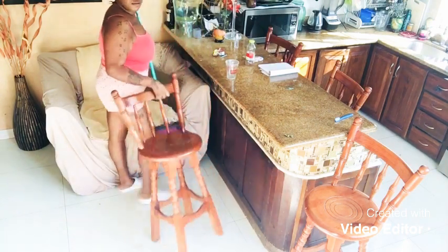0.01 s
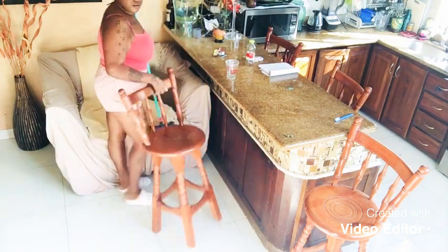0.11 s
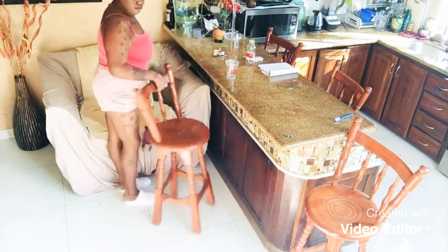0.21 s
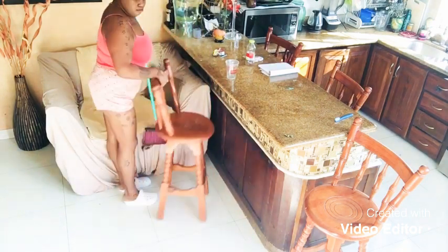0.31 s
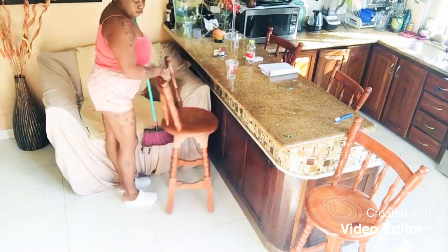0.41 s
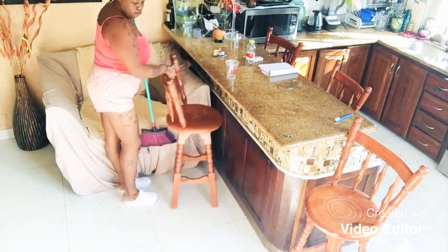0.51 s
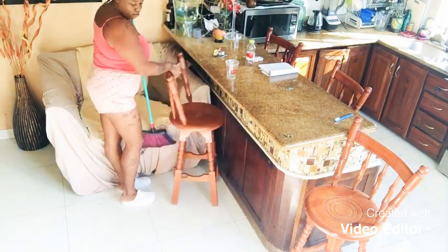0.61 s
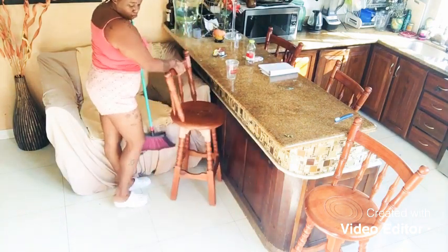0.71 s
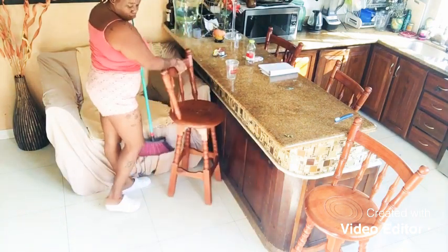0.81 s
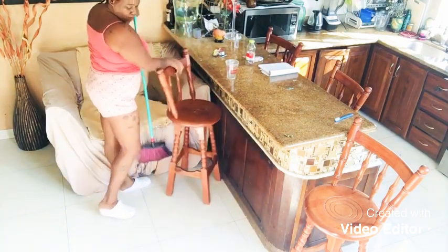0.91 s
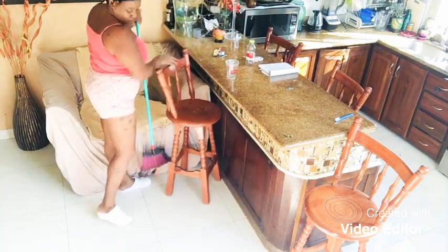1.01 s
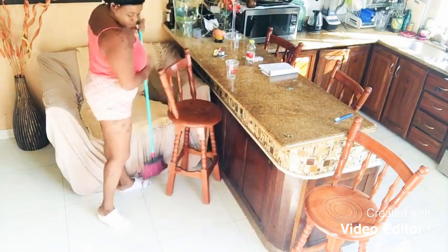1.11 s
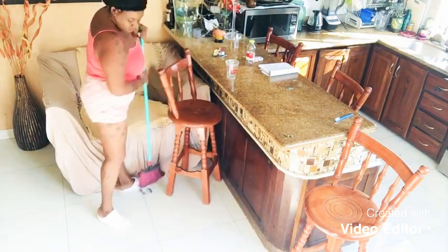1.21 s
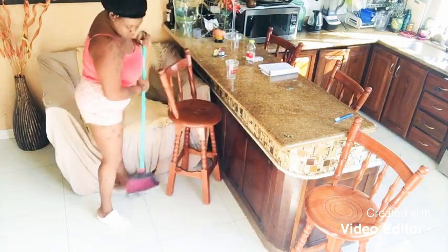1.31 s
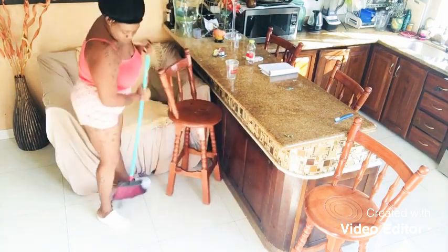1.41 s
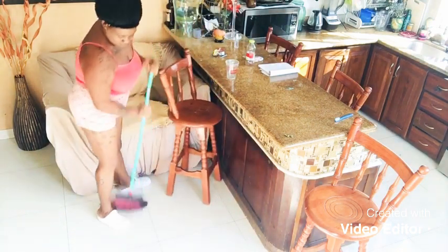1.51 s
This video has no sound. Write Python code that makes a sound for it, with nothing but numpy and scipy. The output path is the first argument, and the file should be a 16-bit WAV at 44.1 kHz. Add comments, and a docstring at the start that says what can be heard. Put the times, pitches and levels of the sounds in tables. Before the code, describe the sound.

A wooden stool scrapes and groans over a tiled floor after landing with a knock, settles, then briefly scrapes again. Dull steps thud underneath and a broom sweeps faintly, all heard from across a hard, echoing kitchen.

```python
"""A wooden stool is set down and dragged over a tiled kitchen floor: its feet stick and slip, bite on
the tile and shake the frame, and its legs groan. It knocks to rest and gets one more short shove.
Steps make the hard room boom low; a broom sweeps and a slipper scuffs faintly. One microphone
stands in the kitchen, far enough off that the knocks are almost matched by their echo."""
import sys
import numpy as np
from scipy import signal
from scipy.fft import rfft, irfft
from scipy.io import wavfile
from scipy.ndimage import uniform_filter1d

SR = 44100
rng = np.random.default_rng(int(sys.argv[2]) if len(sys.argv) > 2 else 0)


def inscribe(sig):
    """Save sig as 16-bit PCM at rate SR to the path in sys.argv[1].

    A 1-D sig is mono; a 2-D sig holds one channel per row.
    Samples are clipped to [-1, 1] before scaling.
    """
    pcm = np.round(np.clip(np.atleast_2d(sig).T, -1, 1) * 32767)
    wavfile.write(sys.argv[1], SR, pcm.astype(np.int16))


N = 70560


def drag(feet=2, slide_grit=0.58, bite_grit=1.6):
    """The stool's feet judder over the tile, rasp brighter where they bite, and shake the frame."""
    pressure = [(.21, -90), (.235, -53), (.27, -25.5), (.30, -38), (.355, -32.5), (.41, -23.5), (.46, -29),
                (.53, -29.5), (.59, -29), (.66, -32), (.70, -39), (.76, -44.5), (.82, -48.5), (.875, -36.5),
                (.92, -44.5), (1.04, -50), (1.105, -30.5), (1.15, -38.5), (1.22, -99.5)]  # bearing of the sliding feet: time_s, level_db
    slide_colour = [(30, -26.5), (70, -24.5), (120, -2), (280, -1.5), (500, 2), (780, -3.5), (1150, 1),
                    (2100, -11.5), (3600, -20.5), (4900, -29.5), (7000, -31), (15000, -52.5)]  # spectrum of the slide: frequency_hz, level_db
    bites = [(0.374, -24, 0.0035, 0), (.401, -13.5, 0.0037, 0), (0.435, -23, 0.0019, -3.5),
             (0.488, -25.5, 0.0087, -0.5), (0.539, -21.5, .006, -4.5), (0.567, -22, 0.0083, 2.5),
             (0.584, -17, 0.0053, 0.5), (0.624, -29, .004, 2), (.644, -18, 0.0086, 1.5),
             (0.878, -37.5, 0.0064, 2), (1.118, -25.5, 0.005, -1)]  # a foot catching: peak_s, level_db, half_length_s, tilt_db_per_octave
    bite_colour = [(60, -14), (400, -10), (1100, -2), (2100, 1), (2700, -4), (3700, -7.5), (4900, -21.5),
                   (7000, -27), (10000, -36), (15000, -53)]  # spectrum of a bite: frequency_hz, level_db
    out = level(pressure) * unit(sum(wood(slips(slide_grit), slide_colour) for _ in range(feet)))
    for peak_s, db, half_s, tilt_db in bites:
        grip = np.exp(-.5 * ((clock() - peak_s) / half_s) ** 2)
        rasp = wood(slips(bite_grit) * grip, bite_colour, tilt_db)
        out += amp(db) * rasp * np.sqrt(2 * half_s * SR) / np.linalg.norm(rasp)
    return room(out, wet_db=-2.5) + room(shudder(slips(slide_grit)), wet_db=-11)


def slips(grit, mean_slips_per_s=600, scatter_db=3):
    """Force at a sliding foot: uneven stick-slip jerks over fine grit."""
    pace = np.repeat(rng.exponential(1, N // 64 + 1), 64)[:N]
    cycles = np.cumsum(pace) * mean_slips_per_s / SR
    jerks = np.diff(np.floor(cycles), prepend=0) * scatter(scatter_db)
    return unit(jerks) + grit * rng.standard_normal(N)


def wood(force, colour, tilt_db=0, pitch_spread=.025):
    """Legs and seat ring to a force at a foot; every contact finds slightly different resonances."""
    resonances = [(491, 9.1, -4), (643, 22, -4), (944, 100, -1.5), (1123, 34, 1), (1580, 24, -6),
                  (1660, 67, -7), (1715, 32, -11), (2070, 140, -4.5), (3030, 69, -10), (3567, 58, -3)]  # modes of legs and seat: pitch_hz, width_hz, level_db
    modes = [(hz * (1 + pitch_spread * rng.standard_normal()), width, db + 2 * rng.standard_normal())
             for hz, width, db in resonances]
    return coloured(force + resonate(force, modes), colour, tilt_db)


def shudder(force):
    """The jerks of the feet shake the frame in its low bending modes."""
    modes = [(176.2, 15, 2), (195.2, 8.5, -8.5), (226.6, 15, -6.5), (347.7, 14, -4)]  # bending of the frame: pitch_hz, width_hz, level_db
    shaking = [(.21, -78), (.26, -34), (.40, -35), (.58, -33), (.70, -40), (.78, -54), (.84, -37),
               (.91, -39), (.95, -58), (1.04, -44.5), (1.115, -32.5), (1.17, -44), (1.3, -54), (1.4, -68)]  # strength of the shudder: time_s, level_db
    bands = [(hz, 4 * width, 0) for hz, width, _ in modes]  # trim the noise far from the modes
    return level(shaking) * unit(resonate(resonate(force, modes), bands))


def knocks(t60_s=0.063, level_window_s=0.018):
    """Each stool foot landing on the tile sets off a dense, short ring of the wood."""
    landings = [(0.2176, -14.5, -0.5), (0.2267, -13, 0.5), (0.275, -29, 3), (.811, -28.5, -1.5),
                (.825, -24.5, -4.5), (0.852, -40.5, 5.5), (1.055, -41, 1.5), (1.077, -35.5, -11)]  # feet striking: start_s, level_db, tilt_db_per_octave
    colour = [(30, -41), (70, -14), (250, -13.5), (500, -9.5), (700, -5.5), (950, -3.5), (1650, -1),
              (2200, -8), (3500, -11.5), (4800, -26.5), (7000, -31.5), (15000, -49.5)]  # spectrum of a knock: frequency_hz, level_db
    out = np.zeros(N)
    for start_s, db, tilt_db in landings:
        age = clock() - start_s
        burst = rng.standard_normal(N) * (age >= 0) * amp(-60 * abs(age) / t60_s)
        ring = wood(burst, colour, tilt_db)
        out += room(amp(db) * ring * np.sqrt(level_window_s * SR) / np.linalg.norm(ring), wet_db=-1)
    return out


def groans(roughness=.25):
    """A faint creak of the frame, then short, slightly rough low groans of the legs."""
    creaks = [(.07, 0.12, 610, 572, -54), (0.459, 0.078, 354.3, 351, -30.5),
              (0.508, 0.15, 171.4, 168.7, -36), (0.629, 0.068, 352.8, 346.3, -36),
              (.82, .22, 245, 265, -41.5), (0.95, 0.115, 273, 244, -46), (1.07, 0.079, 170, 173, -32),
              (1.149, 0.07, 189.2, 198, -42)]  # creak and groans: start_s, length_s, start_hz, end_hz, level_db
    out = np.zeros(N)
    for start_s, length_s, start_hz, end_hz, db in creaks:
        progress = np.clip((clock() - start_s) / length_s, 0, 1)
        phase = 2 * np.pi * np.cumsum(start_hz + (end_hz - start_hz) * progress) / SR
        waver = 1 + roughness * unit(uniform_filter1d(rng.standard_normal(N), size=500))
        out += amp(db) * np.sqrt(2) * np.sin(np.pi * progress) * waver * np.sin(phase)
    return room(out, wet_db=-9.5)


def thuds(boom_hz=74.8, t60_s=0.4, rise_s=0.01, thump_db=-5.5, lift_db=7):
    """Steps and weight on the floor give a dull thump and wake the room's low mode."""
    footfalls = [(.0, -46.5), (0.078, -42.5), (.22, -33.5), (0.382, -38.5), (0.479, -36), (.60, -32),
                 (0.682, -41), (0.814, -37), (.865, -37), (1.0, -47), (1.086, -40), (1.508, -58)]  # weight landing: start_s, level_db (before lift_db)
    out = np.zeros(N)
    for start_s, db in footfalls:
        age = np.maximum(clock() - start_s, 0)
        rumble = resonate(rng.standard_normal(N), [(82, 62, 0)])
        thump = amp(thump_db) * unit(resonate(rumble, [(84, 45, 0)]))
        envelope = amp(db + lift_db - 60 * age / t60_s) * (1 - np.exp(-age / rise_s))
        out += envelope * (np.sin(2 * np.pi * boom_hz * age) + thump)
    return out


def broom():
    """Bristles flick over the tile with a faint, bright hiss."""
    sweeps = [(.04, 0.14, -54, -3), (.10, 0.018, -51, -0.5), (.985, 0.017, -53, -1),
              (1.048, 0.0088, -50, -0.5), (1.075, 0.02, -45, -3), (1.17, 0.057, -51.5, -2),
              (1.458, 0.013, -58.5, 0), (1.49, 0.09, -55.5, -0.5)]  # broom strokes: start_s, hold_s, level_db, tilt_db_per_octave
    bristles = [(200, -18.5), (1000, -3), (3300, -1), (4400, 0.5), (5100, -5), (7000, -5.5), (8200, -11.5),
                (11300, -10), (12800, -17.5), (15000, -25.5)]  # spectrum of the hiss: frequency_hz, level_db
    return brush(sweeps, bristles, grain_db=6.5)


def slipper():
    """A slipper scuffs the tile, duller and grainier than the broom."""
    scuffs = [(-.02, 0.048, -49, -1), (.082, 0.019, -45, -1.5), (.195, .02, -46, 3.5)]  # sole rubbing: start_s, hold_s, level_db, tilt_db_per_octave
    sole = [(100, -25), (300, 1), (600, 2), (1500, -4), (3000, -10), (8000, -18), (15000, -50)]  # spectrum of a scuff: frequency_hz, level_db
    return brush(scuffs, sole, grain_db=10)


def brush(strokes, colour, grain_db, rise_s=0.0068, fall_s=0.036):
    """Soft strokes over the tile: many tiny flicks that swell, hold and fade."""
    out = np.zeros(N)
    for start_s, hold_s, db, tilt_db in strokes:
        age = clock() - start_s
        flicks = rng.standard_normal(N) * scatter(grain_db)
        envelope = np.clip(age / rise_s, 0, 1) * np.exp(-np.maximum(age - hold_s, 0) / fall_s)
        out += amp(db) * envelope * unit(coloured(flicks, colour, tilt_db))
    return room(out, wet_db=-7.5)


def room(direct, wet_db, build_s=0.0067):
    """Direct sound plus the kitchen's echo, each frequency dying at its own speed."""
    decay = [(100, 0.65), (300, 0.57), (1500, 0.44), (4500, 0.54), (9000, 0.37), (15000, 0.59)]  # reverberation time: frequency_hz, t60_s
    hz, t, spectra = signal.stft(rng.standard_normal(SR), SR, nperseg=256)
    tail = signal.istft(spectra * amp(-60 * t / along(decay, hz)[:, None]), SR, nperseg=256)[1]
    tail *= np.clip(np.arange(len(tail)) / SR / build_s, 0, 1) ** 2
    return direct + amp(wet_db) * signal.fftconvolve(direct, tail / np.linalg.norm(tail))[:N]


def room_tone(level_db=-58.5):
    """The quiet of the kitchen: a steady low rumble under a thin hiss."""
    colour = [(20, -46), (62, 3), (120, -13.5), (200, -3), (350, -30), (1000, -35), (4000, -32),
              (10000, -38), (15000, -44.5)]  # spectrum of the background: frequency_hz, level_db
    return amp(level_db) * unit(coloured(rng.standard_normal(N), colour))


def amp(db):
    """Decibels to gain."""
    return 10 ** (np.asarray(db) / 20)


def unit(x):
    """Scale to rms 1."""
    return x / np.sqrt(np.mean(x ** 2) + 1e-20)


def scatter(spread_db):
    """A random gain for every sample."""
    return amp(spread_db * rng.standard_normal(N).clip(-2, 2))


def along(points, hz):
    """Interpolate (frequency_hz, value) points on a log axis."""
    point_hz, values = np.transpose(points)
    return np.interp(np.log(hz + 1), np.log(point_hz + 1), values)


def clock():
    """Time of every sample in seconds."""
    return np.arange(N) / SR


def level(points):
    """Gain per sample from (time_s, level_db) points."""
    return amp(np.interp(clock(), *np.transpose(points)))


def coloured(x, points, tilt_db=0, size=8192):
    """Causal filter through (frequency_hz, level_db) points, tilted per octave above the bass."""
    hz = np.fft.rfftfreq(size, 1 / SR)
    octaves = np.log2(np.clip(hz, 400, 8000) / 1500)
    cepstrum = irfft(np.log(amp(along(points, hz) + tilt_db * octaves)))
    cepstrum[1:size // 2] *= 2  # fold to minimum phase
    cepstrum[size // 2 + 1:] = 0
    impulse = irfft(np.exp(rfft(cepstrum)))
    return signal.fftconvolve(x, impulse[:size // 2])[:N]


def resonate(x, modes, size=16384):
    """x through parallel resonances (pitch_hz, width_hz, level_db)."""
    f = np.fft.rfftfreq(size, 1 / SR)
    response = sum(amp(db) * 1j * f * width / (hz * hz - f * f + 1j * f * width)
                   for hz, width, db in modes)
    return signal.fftconvolve(x, irfft(response)[:size // 2])[:N]


def scene():
    """Stool, steps, broom and slipper over the room tone, as they reach the one microphone."""
    quiet = room_tone()
    stool = knocks() + drag() + groans()
    return (stool + thuds() + broom() + slipper() + quiet)[None]


def record(dry, low_cut_hz=37, ceiling=.95, top_hz=15700):
    """The recorder drops the deepest bass, rounds the highest peaks and cuts the top treble."""
    x = signal.sosfilt(signal.butter(4, low_cut_hz, 'high', fs=SR, output='sos'), dry)
    x = x / (1 + np.abs(x / ceiling) ** 8) ** (1 / 8)
    in_band = np.fft.rfftfreq(2 * N, 1 / SR) < top_hz
    return irfft(rfft(x, 2 * N) * in_band)[:, :N]


dry = scene()
out = record(dry)
inscribe(out)
```